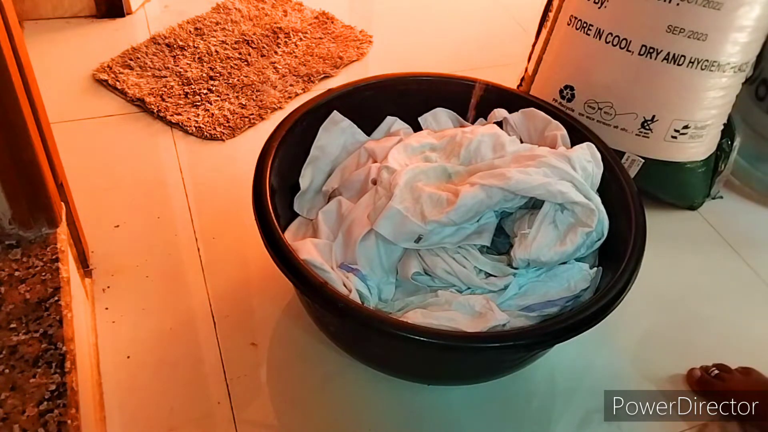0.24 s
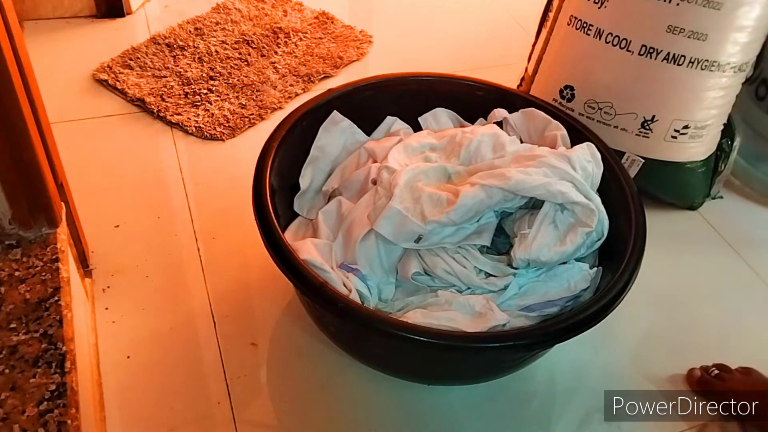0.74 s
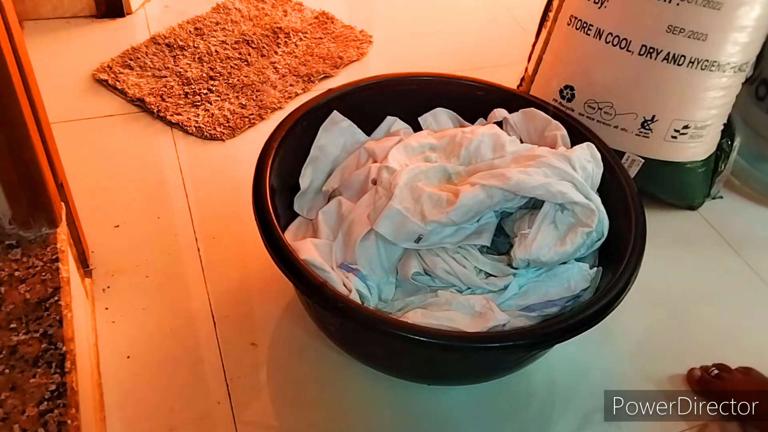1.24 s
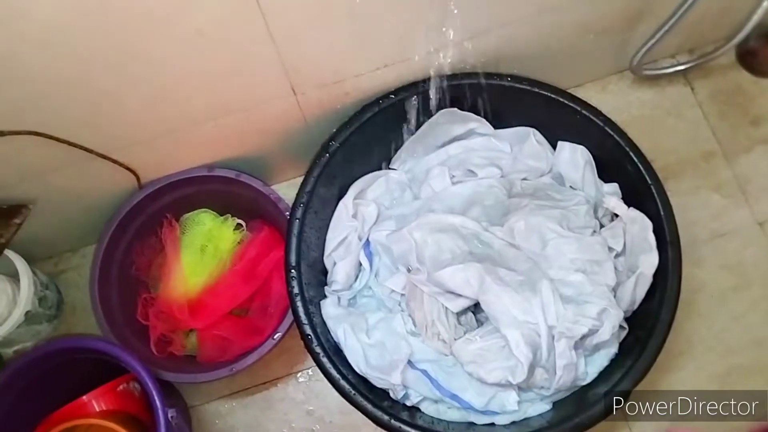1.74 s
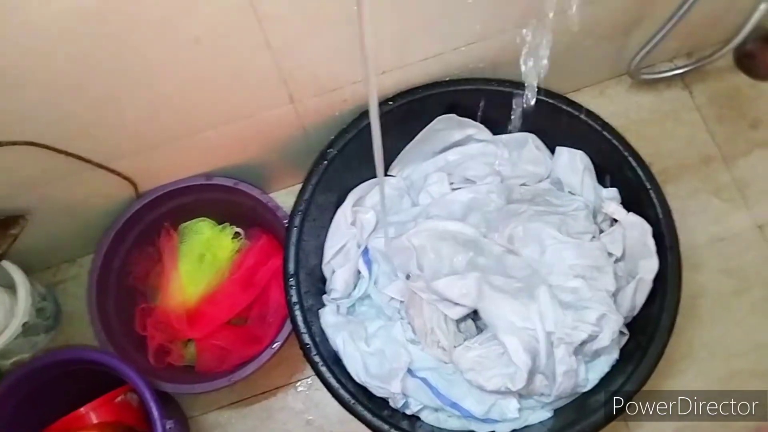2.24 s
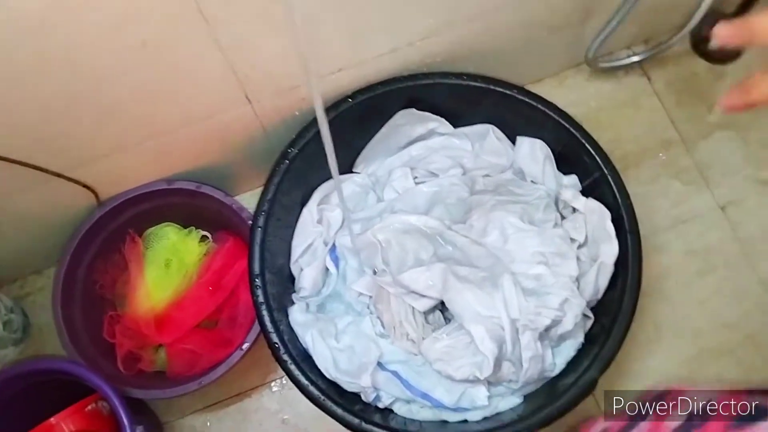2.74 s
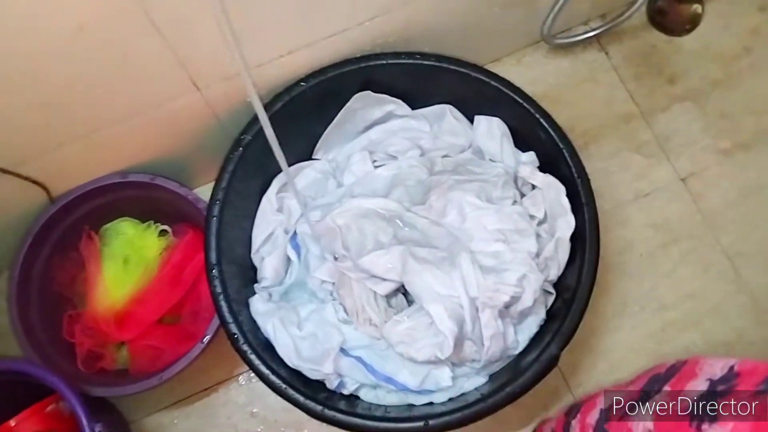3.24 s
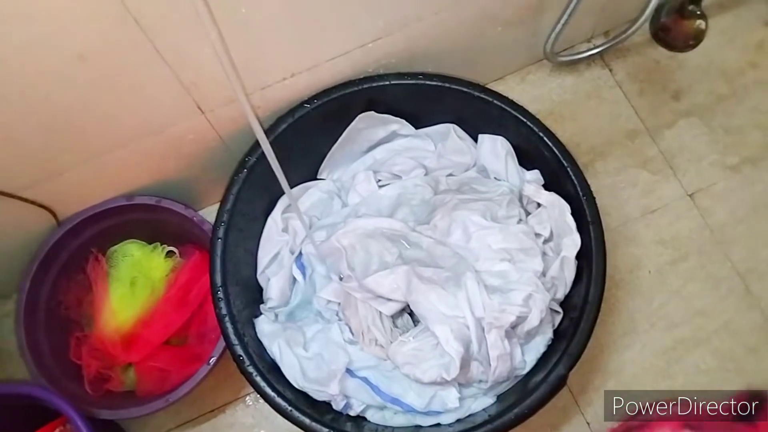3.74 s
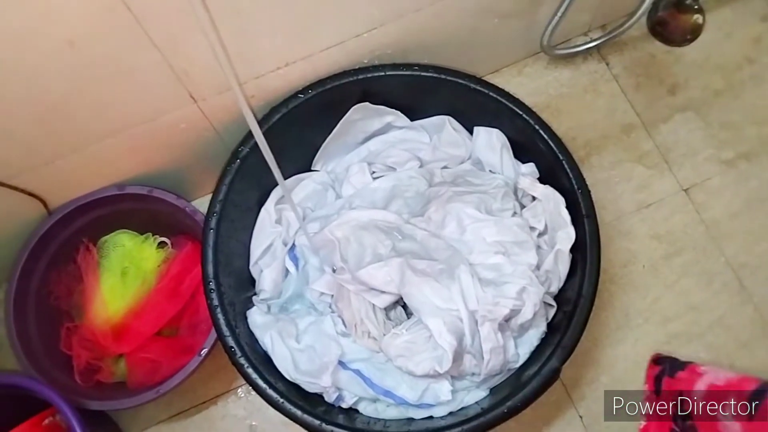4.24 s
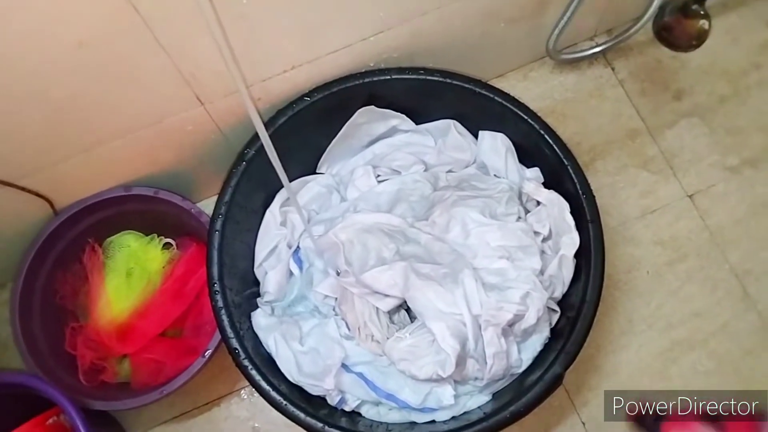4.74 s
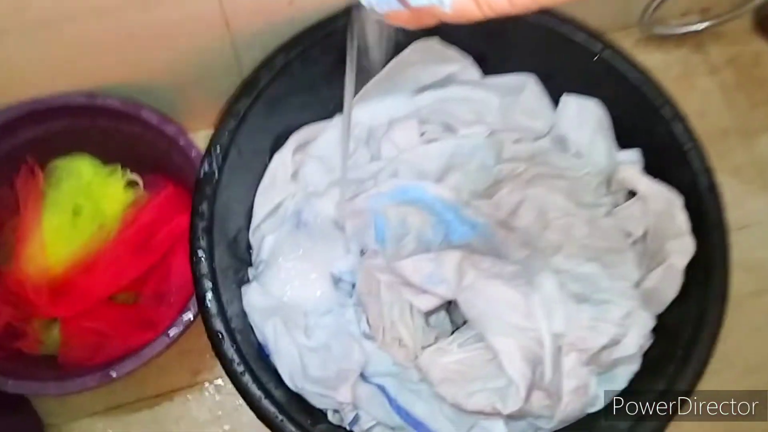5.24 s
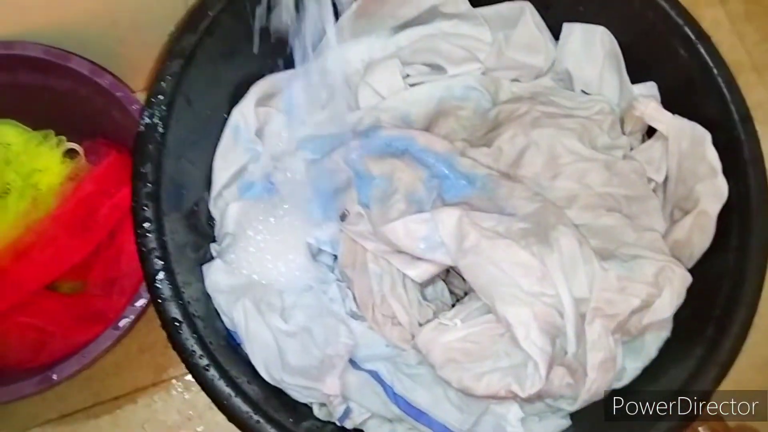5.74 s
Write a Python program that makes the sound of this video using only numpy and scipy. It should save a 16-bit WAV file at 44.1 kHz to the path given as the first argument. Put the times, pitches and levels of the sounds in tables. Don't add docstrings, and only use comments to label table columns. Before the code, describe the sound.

From 0 to 1.45 s a quiet tiled room rumbles softly. A bright drip ticks at the very start, fainter ones follow until about 0.4 s, mostly on the right; something light brushes the tiles near 0.4 s, and two soft drips come around 1.1 s. At 1.45 s a hard cut starts tap water spraying on wet cloth in a plastic tub. Until 2.2 s it surges irregularly, with hollow low glugs and sharp spurts, strongest near 2 s. From 2.4 to 5.1 s it runs more evenly: dense crisp droplet ticks, hissing mist, popping froth, small plops and a low wavering pump hum, with a gulp at 2.9 s and a gurgle at 4.7 s. At 5.18 s it cuts closer: softer spray, a stronger hum, glugs, and clustered drops around 5.6 s, continuing to the end at 6 s. Nearby phone microphones give short tiled echo, a ringing treble on the right and slight clipping.

```python
import sys
import numpy as np
from scipy import signal
from scipy.fft import rfft, irfft, next_fast_len
from scipy.io import wavfile
from scipy.ndimage import uniform_filter1d

SR = 44100
rng = np.random.default_rng(int(sys.argv[2]) if len(sys.argv) > 2 else 0)


def voltage_ratio(level):
    return 10 ** (np.asarray(level, float) / 20)


def dump_mix(stems):
    frames = np.atleast_2d(stems).T
    limited = np.clip(frames, -1, 1)
    pcm = np.round(limited * 32767).astype(np.int16)
    wavfile.write(sys.argv[1], SR, pcm)


N = 264159
TIME = np.arange(N) / SR

CUTS = [0, 1.452, 5.178, 6.0]
RUNNING = TIME > CUTS[1]
CLOSER = TIME > CUTS[2]
CLOSE_DB = -6.5


def evened(x):
    return x / np.sqrt(np.mean(x ** 2) + 1e-20)


def read(points, hz):
    f, value = np.transpose(points)
    return np.interp(np.log(hz + 1), np.log(f + 1), value)


def columns(rows):
    s, *rest = np.transpose(rows)
    return [np.interp(TIME, s, c) for c in rest]


def bumps(rows, rise_s, fall_s):
    t, out = np.arange(0, N, 32) / SR, 0
    for s, length, db in rows:
        same_part = (s + length < CUTS[2] + .04) == (t < CUTS[2])
        rise = np.clip((t - s) / rise_s, 0, 1)
        fall = np.exp(-np.maximum(t - s - length, 0) / fall_s)
        out = np.maximum(out, db * same_part * rise * fall)
    return np.interp(TIME, t, out)


def sides(pan_db):
    left = voltage_ratio(np.asarray(pan_db) / 2)
    return np.array([left, 1 / left]) * np.sqrt(2 / (left ** 2 + left ** -2))


# f/Hz, width/Hz, level/dB
PORTS = [
    [(14030, 5600, 3.5), (4232, 800, 0.5)],
    [(8954, 856, 27), (14670, 3900, 5)],
]


def ports(x):
    size = next_fast_len(N + 2048)
    f = np.fft.rfftfreq(size, 1 / SR)
    gains = []
    for port in PORTS:
        gain = 1
        for hz, width, db in port:
            gain = gain + voltage_ratio(db) * 1j * f * width / (hz ** 2 - f ** 2 + 1j * f * width)
        gains.append(gain)
    return irfft(rfft(x, size) * np.array(gains), size)[:, :N]


def in_band(x, lo_hz, hi_hz):
    band = signal.butter(4, [lo_hz, hi_hz], "band", fs=SR, output="sos")
    part = signal.sosfilt(band, x.mean(0))
    return x / np.sqrt(np.mean(part ** 2))


# f/Hz, t/s
TILES = [(1000, 0.12), (4000, 0.3), (9000, 0.41), (15000, 0.12)]


def tiles(x, wet_db):
    hz, t, z = signal.stft(x, SR, nperseg=128, noverlap=64)
    keep = voltage_ratio(-120 * t[1] / read(TILES, hz))
    power = [signal.lfilter([0, 0, 1], [1, -r], abs(z[:, k]) ** 2) for k, r in enumerate(keep)]
    power = np.stack(power, axis=1)
    a, b, patches = rng.standard_normal((3, *power.shape))
    patches = evened(uniform_filter1d(uniform_filter1d(patches, 2, 1), 50, 2))
    echo = np.sqrt(abs(power)) * voltage_ratio(2.5 * patches) * (a + 1j * b)
    tail = signal.istft(echo, SR, nperseg=128, noverlap=64)[1][:, :N]
    return x + voltage_ratio(wet_db) * evened(tail) * np.sqrt(np.mean(x ** 2))


def ping(hz, cycles, glide):
    u = np.arange(int(6 * cycles * SR / hz) + 4) * hz / SR
    pitch_turns = u * (1 + glide * u / (2 * cycles))
    return np.sin(2 * np.pi * pitch_turns) * (1 - np.exp(-u / 0.6)) * np.exp(-u / cycles)


def place(rows, shape):
    out = np.zeros((2, N + SR))
    for s, db, colour, pan_db in rows:
        sound = shape(colour)
        gain = voltage_ratio(db) * sides(pan_db)[:, None] / abs(sound).max()
        out[:, round(s * SR):][:, :len(sound)] += gain * sound
    return out[:, :N]


def grains(lo_hz, hi_hz, cycles, glide, per_s, spread_db, own_db, clump_db, count=11):
    clumps = evened(uniform_filter1d(uniform_filter1d(rng.standard_normal(N), 500), 500))
    size = voltage_ratio(spread_db * np.minimum(rng.exponential(1, N), 4.6) + clump_db * clumps)
    size *= rng.random(N) < per_s / SR
    heard = size * voltage_ratio(own_db * rng.standard_normal((2, N))) * rng.choice([-1., 1.], (2, N))
    kind, out = rng.integers(0, count, N), np.zeros((2, N))
    for k, hz in enumerate(np.geomspace(lo_hz, hi_hz, count)):
        pop = ping(hz, cycles, glide)[None]
        out += signal.oaconvolve(heard * (kind == k), pop, axes=1)[:, :N]
    return out


# f/Hz, level/dB (per Hz)
QUIET = [(25, -19), (60, -24), (120, -2), (250, 0.5), (550, -2.5), (950, -4), (1400, -13.5), (2200, -18.5),
         (3300, -23.5), (5000, -32), (8000, -38.5), (12000, -42), (16000, -39)]
GUSH = [(25, -22), (45, -37), (60, -16.5), (120, -16), (200, -3), (260, -4), (330, -9), (510, -4.5),
        (900, -11), (1440, -14.5), (2400, -19), (3500, -39), (6000, -63)]
CLOSE = [(25, -23), (45, -23), (100, -4.5), (160, -32), (210, -0.5), (260, -11.5), (350, -1.5), (490, -2.5),
         (730, -6.5), (1230, -8.5), (2700, -11.5), (3500, -19.5), (6000, -66)]
RUMBLE_DB = [-43.5, -41, -40.5]
# f/Hz, likeness (1 = the same)
SAME = [(60, 0.67), (130, 0.94), (290, 0.94), (640, 0.29), (1410, -0.14), (3100, 0.15), (6820, 0.033),
        (15000, -0.19)]
# f/Hz, left-right level/dB
LEAN = [(60, 11), (240, 3), (950, 1.5), (3770, 5), (15000, -9.5)]
# t/s, length/s, level/dB
QUIET_SWELL = [(.2, .3, 2.5)]
# t/s, level/dB
TUB = [(1.452, 0.5), (2.6, 1.5), (3.7, -1.5), (4.5, -2), (4.8, -2.5), (5.17, 0.5), (5.56, -1.5), (5.62, -7),
       (5.99, -1.5)]
# t/s, length/s, gurgle level/dB, gush level/dB
SURGES = [
    (1.464, 0.017, -2, 7),
    (1.62, 0.33, 8, 1.5),
    (1.966, 0.21, 8, 1.5),
    (2.931, 0.022, 10, 2),
    (4.69, 0.19, 10, 1),
    (5.19, 0.14, 12, 0.5),
]
SURGE_FALL_S = 0.046


def rumble():
    frames, hz, out = N // 256 + 5, np.fft.rfftfreq(1024, 1 / SR), np.zeros((2, N))
    surge_db = bumps(np.array(SURGES)[:, [0, 1, 3]], 0.0051, SURGE_FALL_S)
    gush_db = 0.72 * columns(TUB)[0] + surge_db
    gush_db = np.where(TIME < CUTS[1], bumps(QUIET_SWELL, 0.25, 0.082), gush_db)
    same = np.clip(read(SAME, hz), -1, 1)[:, None]
    for k, colour in enumerate([QUIET, GUSH, CLOSE]):
        a, b, c, d, patches = rng.standard_normal((frames, 513, 5)).T
        patches = evened(uniform_filter1d(uniform_filter1d(patches, 10, 0), 12, 1))
        left = a + 1j * b
        right = same * left + np.sqrt(1 - same ** 2) * (c + 1j * d)
        z = np.array([left, right]) * voltage_ratio(read(colour, hz)[:, None] + 1.19 * patches)
        z *= sides(read(LEAN, hz) * (hz < 2500) * (k > 0))[:, :, None]
        noise = signal.istft(z, nperseg=1024, noverlap=768)[1][:, :N]
        noise = in_band(ports(noise), 70, 1480)
        out += noise * voltage_ratio(RUMBLE_DB[k] + gush_db) * (TIME >= CUTS[k]) * (TIME < CUTS[k + 1])
    return out


# t/s, peak level/dB, f/Hz, left-right level/dB
DRIPS = [
    (0.0044, -27, 9200, -34),
    (0.032, -12, 14800, -11.5),
    (0.123, -33, 8750, -20),
    (0.1674, -43, 8700, -15),
    (0.3506, -27, 9200, -17),
    (0.381, -39, 9200, -12),
    (1.0784, -36, 8640, -17),
    (1.1702, -31.5, 7840, -16),
]


def drips():
    return tiles(place(DRIPS, lambda hz: ping(hz, 1.1, 0.019)), 4.1) * voltage_ratio(4.0)


# t/s, length/s, level/dB (over silence)
SCUFF = [(.375, 0.071, 38)]
# f/Hz, width/Hz, level/dB
SCUFFED = [(969, 37, -11), (1180, 24, -22), (1370, 110, 3.5), (2200, 45, 3.5)]


def scuff():
    hz = np.fft.rfftfreq(N, 1 / SR)
    colour = sum(voltage_ratio(db) / (1 + (0.64 * (hz - f) / width) ** 2) for f, width, db in SCUFFED)
    rough = irfft(rfft(rng.standard_normal((2, N))) * colour, N)
    return evened(rough) * voltage_ratio(bumps(SCUFF, rise_s=0.0076, fall_s=0.13) - 86)


# multiple of its basic pitch, level/dB
HUM_ORDERS = [(1, -58), (3, -56), (4, -55)]
HUM_DB = [-49.5, -40.5]


def hum():
    waver = rng.standard_normal((2, N))
    drift, sway = (evened(uniform_filter1d(uniform_filter1d(v, 1500), 1500)) for v in waver)
    turns = np.cumsum(129.6 * (1 + .011 * drift)) / SR
    steady = sum(voltage_ratio(db) * np.sin(2 * np.pi * k * turns) for k, db in HUM_ORDERS)
    before = TIME < CUTS[2]
    lifted = voltage_ratio(columns(TUB)[0] + np.where(before, *HUM_DB)) * np.sin(2 * np.pi * 2 * turns)
    sway_db = np.where(before, 4.0, 1.2) * sway
    return np.sqrt(2) * (steady + lifted) * voltage_ratio(sway_db) * RUNNING


# t/s, flow level/dB, froth level/dB (over the flow)
FLOW = [(1.452, 0.5, -1.5), (1.68, 1.5, -4.5), (1.9, -6.5, -3), (2.15, -5, -0.5), (2.4, -0.5, -2),
        (2.52, 0, 0.5), (2.85, 4.5, -1.5), (3.08, -2.5, 0.5), (3.2, 1, 1.5), (3.55, 0, -1.5),
        (3.8, 2.5, -1.5), (4.1, -1.5, 0), (4.55, -1, -1), (4.83, 0.5, 5.5), (5.17, -1, 1), (5.58, 2, 1),
        (5.75, 1.5, -2.5), (5.99, 2, 0.5)]
# t/s, length/s, level/dB (over the flow)
SPURTS = [(1.452, 0.022, 9), (1.52, 0.086, 4.5), (1.71, 0.013, 7), (1.825, 0.022, 0), (1.86, 0.14, 8),
          (1.962, 0.024, 16), (2.05, 0.015, 16), (2.12, 0.0076, 1.5), (2.19, 0.04, 11), (2.335, 0.011, 5.5),
          (2.455, 0.11, 9.5), (2.61, 0.087, 9), (2.72, 0.13, 2.5), (2.825, 0.19, 6.5), (3.135, 0.3, 7.5),
          (3.41, 0.11, 6.5), (3.58, 0.29, 6.5), (3.91, .15, 5.5), (4.12, 0.025, 8.5), (4.24, 0.073, 8.5),
          (4.345, 0.12, 5), (4.44, 0.1, 5.5), (4.65, 0.27, 7.5), (4.93, 0.066, 5.5), (5.0, 0.12, 2),
          (5.1, 0.066, 8.5), (5.2, 0.18, 7), (5.405, 0.035, 10.5), (5.47, 0.16, 9.5), (5.8, 0.13, 6.5)]
SPURT_RISE_S, SPURT_FALL_S = 0.0078, 0.036
# level/dB, share of flow, share of spurts
SPRAY = (-33.5, 0.82, 0.88)
SPRAY_LEFT = (-27.5, 0.84, .25)
MIST = (-37.5, 0.99, 0.33)
FROTH = (-39.5, 0.79, 0.3)


def stream():
    flow_db, foam_db = columns(FLOW)
    spurt_db = bumps(SPURTS, SPURT_RISE_S, SPURT_FALL_S)
    right_db, left_db, mist_db, froth_db = (
        db + CLOSE_DB * CLOSER + by_flow * flow_db + by_spurt * spurt_db
        for db, by_flow, by_spurt in (SPRAY, SPRAY_LEFT, MIST, FROTH))
    spray = grains(5170, 14260, cycles=1.2, glide=0.032, per_s=10000,
                   spread_db=3.0, own_db=2.0, clump_db=2.0)
    mist = grains(11200, 17000, cycles=3.5, glide=0.075, per_s=8300,
                  spread_db=4.0, own_db=0.0, clump_db=2.5)
    froth = grains(2750, 4700, cycles=3.4, glide=0.13, per_s=6200,
                   spread_db=3.5, own_db=1.0, clump_db=3.5)
    ringing = grains(2700, 4600, cycles=13.0, glide=0.02, per_s=380,
                     spread_db=4.0, own_db=2.5, clump_db=2.5, count=9)
    froth = evened(froth) + voltage_ratio(-5.5) * evened(ringing)
    spray = in_band(ports(tiles(spray, -2.5)), 8780, 12000) * voltage_ratio(np.array([left_db, right_db]))
    mist = in_band(ports(tiles(mist, -1.8)), 12700, 14400) * voltage_ratio(mist_db)
    froth = in_band(ports(tiles(froth, 4.5)), 1600, 7500) * voltage_ratio(froth_db + foam_db)
    return (spray + mist + froth) * RUNNING


def splat(fine_db):
    t = np.arange(160) / SR
    swell = (t / .0004) ** 2 * np.exp(-t / 0.00041)

    def ticks(pitches):
        return sum(np.sin(2 * np.pi * (hz * t + rng.random())) for hz in pitches)

    body = ticks(np.linspace(6800, 11080, 12) + rng.uniform(-200, 200, 12))
    fine = ticks(np.linspace(11500, 15700, 10) + rng.uniform(-200, 170, 10))
    return swell * (body + voltage_ratio(fine_db + 15.5) * fine)


# t/s, peak level/dB, fine level/dB (over it)
DROPS = [(1.456, -17, -13), (1.4623, -15, -16), (1.487, -5.5, -15), (1.5272, -5.5, -24),
         (1.5676, -9.5, -23), (1.5846, -5, -18), (1.6259, -5.5, -15), (1.7125, -15, -24),
         (1.7252, -14, -16), (1.764, -14, -11), (1.827, -10.5, -30), (1.862, -18, -25),
         (1.8674, -17.5, -17), (1.894, -14, -14.5), (1.9726, -4.5, -8), (1.9721, -8, -17), (2.055, -21, 1),
         (2.057, -9, -23), (2.124, -7.5, -25), (2.144, -12, -18), (2.1872, -18, -16), (2.2005, -17, -7),
         (2.247, -5.5, -31), (2.3119, -18, -21), (2.3412, -8, -24), (2.427, -19, -26), (2.455, -17, -20),
         (2.4643, -8.5, -20.5), (2.493, -13, -16), (2.5064, -5, -20), (2.5409, -15, -8), (2.587, -18, -14),
         (2.6107, -6, -15), (2.637, -8, -19), (2.664, -8.5, -11), (2.814, -13, -17), (2.8323, -3, -20),
         (2.8776, -8, -22), (2.964, -14.5, -24), (2.974, -13, -19), (2.9914, -3.5, -11), (3.0003, -6, -24),
         (3.0412, -10.5, -11), (3.114, -14.5, -11), (3.142, -11.5, -18), (3.196, -5, -15),
         (3.2622, -13, -19), (3.313, -11, -18), (3.3266, -6, -16),
         (3.3673, -6, -17.5), (3.4404, -5, -18), (3.4884, -20, -11), (3.503, -10.5, -16),
               (3.5155, -7.5, -17.5), (3.6003, -8, -8), (3.629, -10, -8), (3.665, -8, -16),
               (3.6861, -7.5, -20), (3.718, -7, -21), (3.7589, -6, -10), (3.7796, -3, -20),
               (3.8228, -7, -27), (3.8692, -7.5, -19), (3.915, -4, -18), (3.929, -6, -22.5),
               (3.9675, -6.5, -21), (4.0167, -2, -17), (4.0447, -10, -19), (4.0647, -15, -9),
               (4.1321, -24, -26), (4.1415, -5.5, -19), (4.1854, -12.5, -17), (4.2139, -9, -15),
               (4.249, -9.5, -25), (4.2837, -8, -26), (4.3301, -15, -6), (4.3497, -9, -17),
               (4.361, -9, -14), (4.3993, -8, -17), (4.4344, -12, -23), (4.4505, -7, -19),
               (4.4833, -9, -17), (4.5227, -8, -18), (4.542, -11.5, 1), (4.563, -7, -10), (4.635, -23, -17),
               (4.649, -19, -23), (4.6612, -12, -14), (4.6673, -5, -19), (4.702, -3, -20),
               (4.765, -13, -16), (4.7915, -8, -16), (4.7994, -10, -24), (4.8466, -8, -19.5),
               (4.9572, -6.5, -26), (4.9777, -3, -17), (5.015, -16, -21), (5.053, -22, -15),
               (5.0764, -13, -17), (5.11, -8, -24),
         (5.2024, -11.5, -21), (5.2574, -15, -18), (5.4126, -16.5, -28), (5.5209, -20, -20),
               (5.5403, -12, -9), (5.562, -13, -23), (5.5775, -9, -19), (5.587, -6, -27), (5.5954, -9, -32),
               (5.6023, -10.5, -23), (5.6184, -15, -11), (5.6264, -27, -24), (5.6344, -17, -16),
               (5.6695, -10, -12), (5.6844, -13.5, -19), (5.7534, -16, -27), (5.8733, -9, -9),
               (5.91, -11.5, -13)]


def drops():
    length_s, per_s = N / SR - CUTS[1], 14
    when, size, fine = rng.random((int(per_s * length_s), 3)).T
    s = CUTS[1] + when * length_s
    spurt_db = bumps(SPURTS, SPURT_RISE_S, SPURT_FALL_S)[(s * SR).astype(int)]
    db = -18 - 3.5 * np.log(size + 0.028) + spurt_db - 9 + CLOSE_DB * (s > CUTS[2])
    patter = np.transpose([s, db, -25 + 12 * (fine - .5)])
    rows = np.vstack([DROPS, patter])
    pan_db = -8 + 6.5 * rng.standard_normal(len(rows))
    bursts = place(np.column_stack([rows, pan_db]), splat)
    return ports(tiles(bursts, -17.0)) * voltage_ratio([[-7.0], [-15.5]])


# t/s, peak level/dB, f/Hz, left-right level/dB
PLOPS = [(1.4572, -24, 2570, 11.5), (1.7217, -29, 3100, -4), (2.3042, -33.5, 1540, 3),
         (3.1781, -24, 2080, 3.5), (3.404, -26, 3470, -6), (3.528, -25, 2820, 0),
         (3.697, -26.5, 2910, -9.5), (3.774, -28.5, 2900, 16), (3.7953, -25, 3180, 0),
         (4.246, -32, 3200, 3), (4.2579, -26, 3300, -11), (4.3118, -30, 2900, -1), (4.522, -23, 3220, 32),
         (4.688, -23.5, 2660, 3), (4.833, -19, 2760, 7.5), (4.9172, -31.5, 2050, -4),
         (4.9359, -19, 3030, -1.5), (5.1817, -31, 1830, -11), (5.228, -33, 1400, 10),
         (5.2457, -28.5, 3060, -12), (5.3594, -29, 3390, -12), (5.7558, -35.5, 1400, 2),
         (3.6285, -18, 12500, -6), (4.5645, -11, 13500, 0), (5.669, -24, 12500, -4), (5.91, -26, 14800, 0),
         (5.5645, -17.5, 5800, -8), (5.587, -28, 6070, -8), (5.596, -22.5, 5870, -10),
         (5.602, -22.5, 5950, 3)]


def plops():
    return tiles(place(PLOPS, lambda hz: ping(hz, 1.0, 0.052)), 3.7) * voltage_ratio(7.5)


# t/s, peak level/dB, f/Hz, left-right level/dB
GLUGS = [(1.46, -33, 204.5, 10), (1.61, -36, 344, 8), (1.625, -33.5, 485, 1), (1.695, -30, 347, 3),
         (1.71, -33, 543, 3), (1.82, -40, 255, 1), (1.865, -37, 477, 5), (2.04, -36, 507, -2),
         (2.19, -34.5, 444, 10), (5.2, -35, 451, -2), (5.215, -32.5, 349, 1), (5.34, -39, 520, 1),
         (5.38, -39, 362, 1), (5.56, -38, 521, 1)]


def glugs():
    return place(GLUGS, lambda hz: ping(hz, 11.0, 0.015))


def gurgle():
    bubbles = grains(260, 560, cycles=6.3, glide=0.016, per_s=400,
                     spread_db=2.5, own_db=-0.7, clump_db=-4.5, count=6)
    surge_db = bumps(np.array(SURGES)[:, :3], 0.056, SURGE_FALL_S)
    return evened(bubbles[0]) * voltage_ratio(-53 + surge_db) * RUNNING


def scene():
    quiet_room = rumble() + drips() + scuff()
    water = stream() + drops() + plops() + glugs() + gurgle()
    return quiet_room + hum() + water


def low_pass(x):
    return signal.sosfilt(signal.butter(12, 16490, fs=SR, output="sos"), x)


def record(dry):
    edge = signal.firwin(511, 15900, window=("kaiser", 7), fs=SR)
    limited = signal.oaconvolve(np.clip(dry, -.88, .88), edge[None], "same", axes=1)
    return low_pass(limited)


dry = scene()
out = record(dry)
dump_mix(out)
```